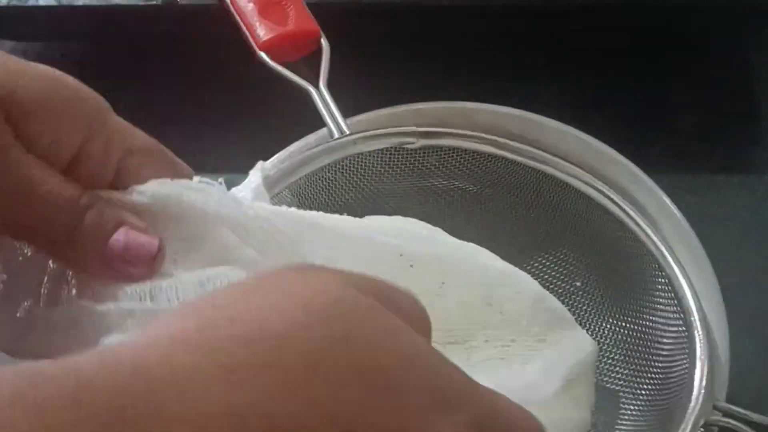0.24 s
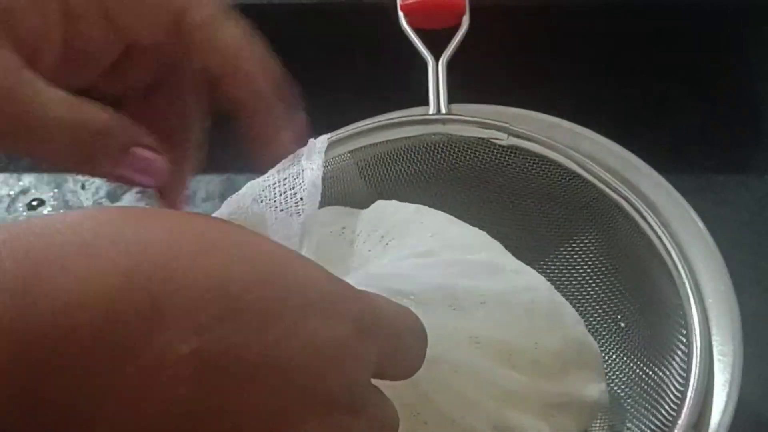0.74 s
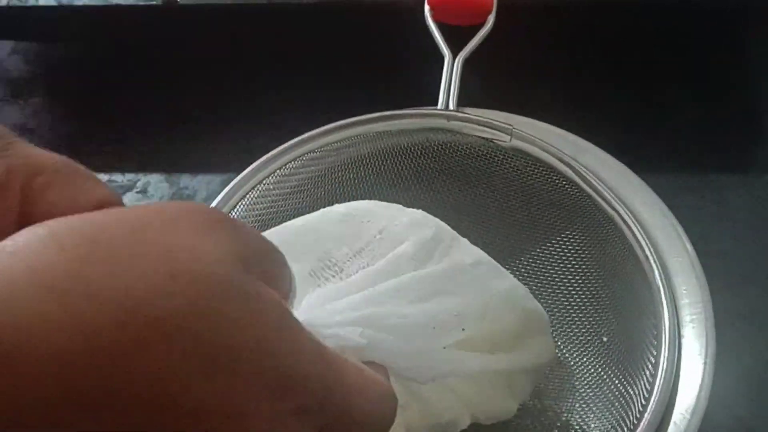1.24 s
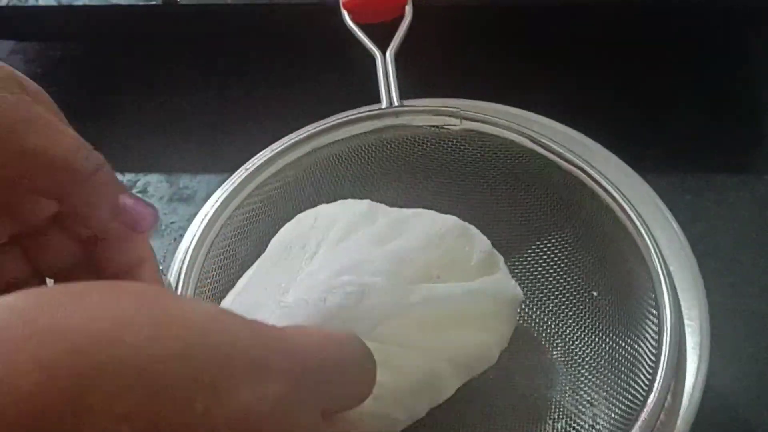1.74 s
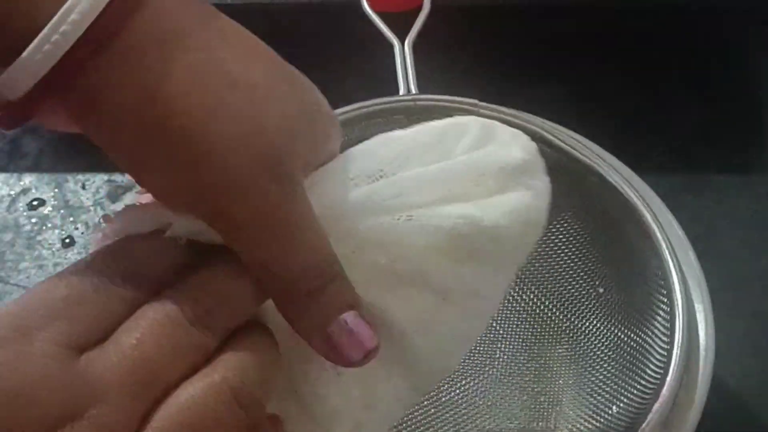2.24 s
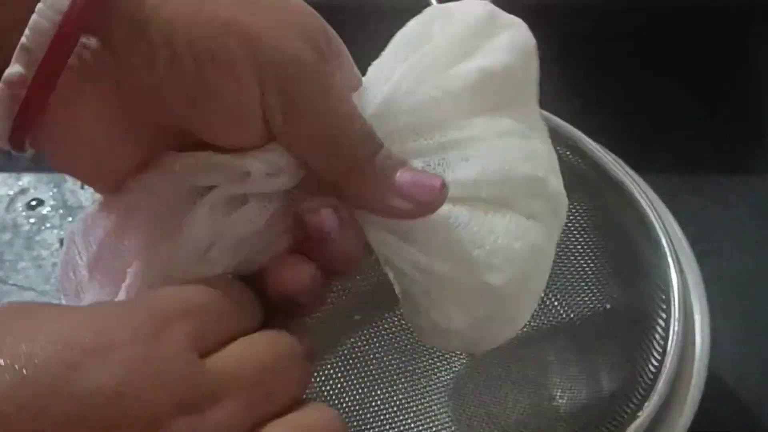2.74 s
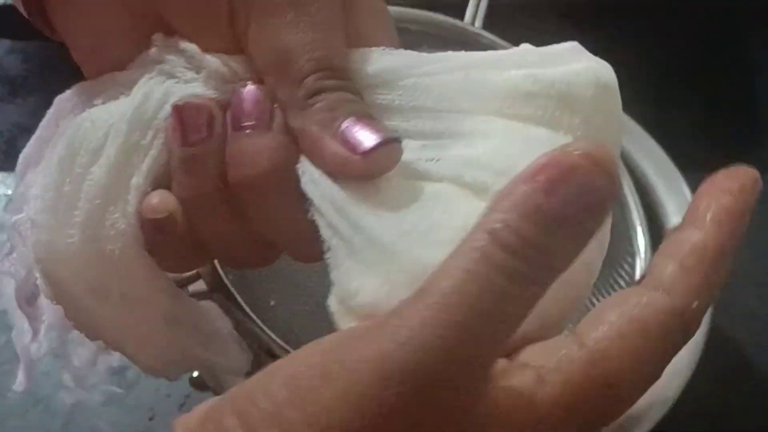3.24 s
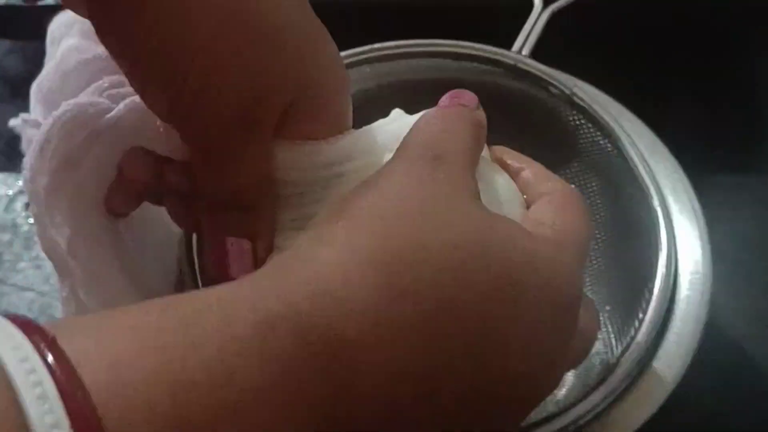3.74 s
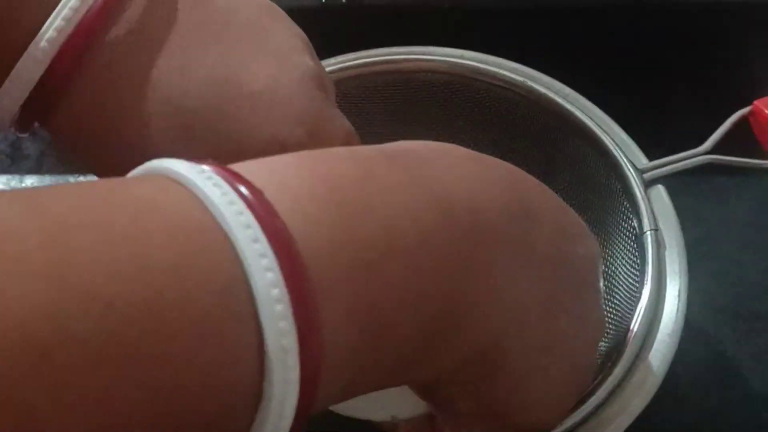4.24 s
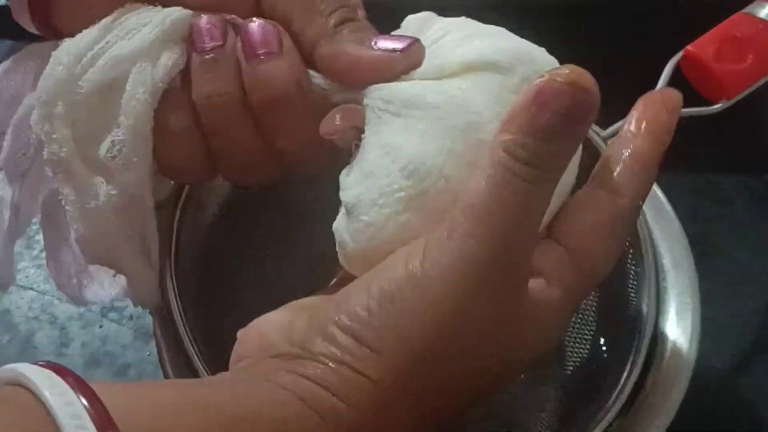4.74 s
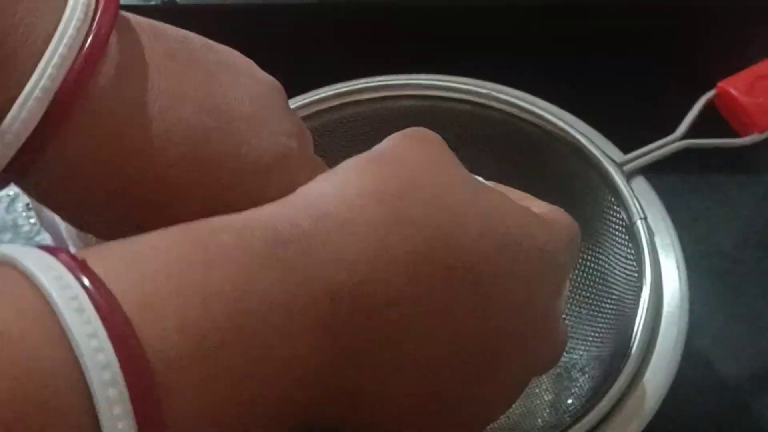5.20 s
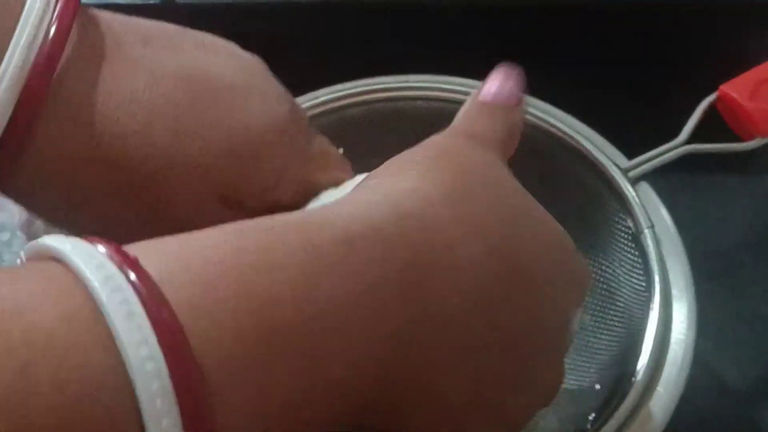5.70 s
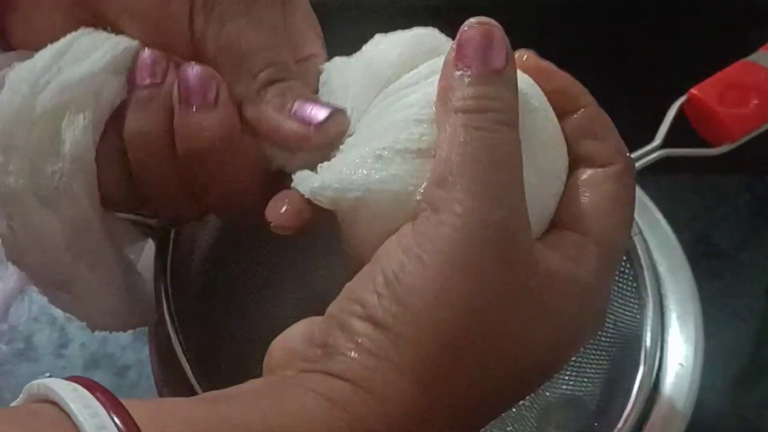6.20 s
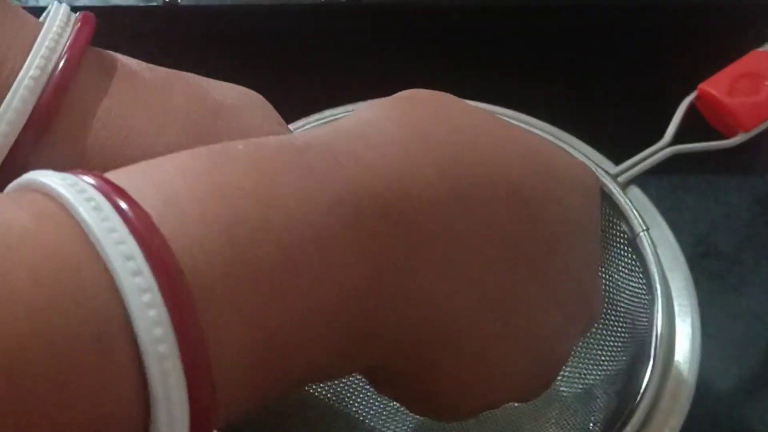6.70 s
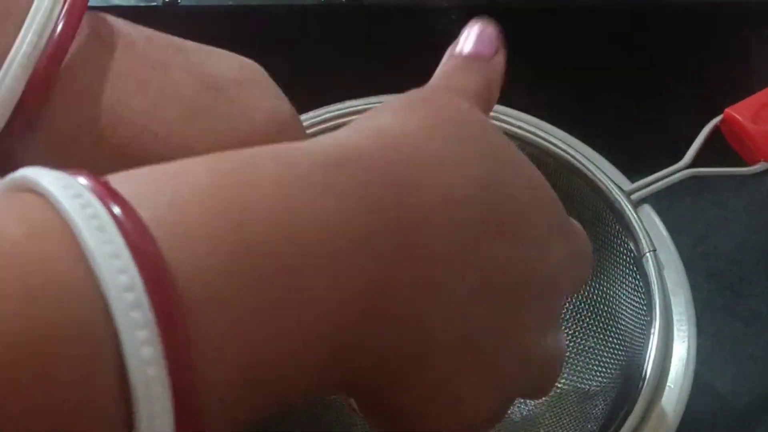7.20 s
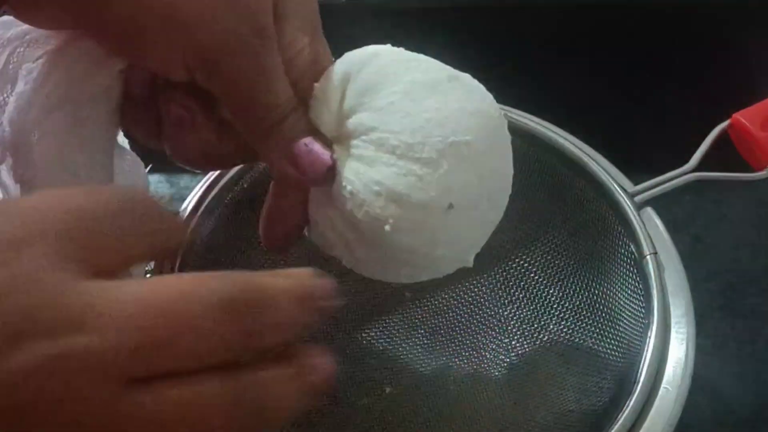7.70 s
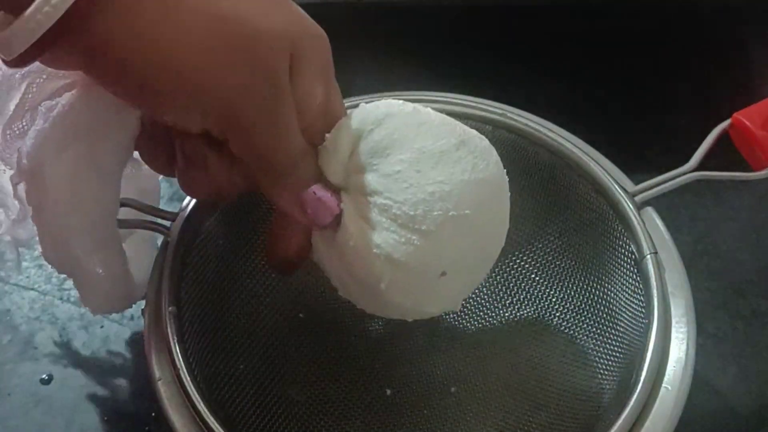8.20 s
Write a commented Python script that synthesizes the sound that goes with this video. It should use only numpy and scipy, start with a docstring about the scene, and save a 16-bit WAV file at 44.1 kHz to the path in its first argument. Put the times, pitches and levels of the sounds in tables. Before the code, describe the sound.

In a quiet kitchen, close in stereo, a wire strainer knocks on a steel bowl resting on a stone counter. From 0 to 0.8 s there are scattered clanks, strongest near 0.4 s; after a short lull, a brisk rattling run fills 1.25 to 1.75 s, with firm hits near 1.25 and 1.6 s. It dies away by 2.1 s, leaving faint, crisp wet ticks from cloth and whey. A small group of knocks comes at 2.8 to 3 s, then soft thuds and rubs until 4.3 s. Denser clatter runs from 4.4 to 6.5 s, with brief gaps, low thuds and bright clinks. Only wet ticks remain around 6.7 to 6.9 s. A last cluster rattles from 7.2 to 7.8 s, then tiny fizzing ticks to 8.4 s. A faint low hum throbs throughout under soft airy rustle; the room tail is short and dull.

```python
"""In a quiet kitchen, wet cheese in a cloth is squeezed over a steel strainer resting on a steel bowl.
The strainer knocks on the bowl on a stone counter: noise bursts excite resonant modes of steel and wire.
Whey and cloth tick faintly: grains of noise ring around one pitch. A dull diffuse tail follows both.
Underneath lie flickering bands of noise, wavering narrow tones and two steady tones that beat.
Two microphone ports a hand apart hear it in stereo."""
import sys
import numpy as np
from scipy import signal
from scipy.fft import rfft, irfft
from scipy.io import wavfile

SR = 44100
rng = np.random.default_rng(int(sys.argv[2]) if len(sys.argv) > 2 else 0)


def master(y):
    """Save y as 16-bit WAV."""
    cut = np.clip(np.atleast_2d(y).T, -1, 1)
    pcm = np.round(cut * 32767)  # scale
    wavfile.write(sys.argv[1], SR, pcm.astype(np.int16))


N = 372733

# Strainer knocking on the bowl; levels precede the part gains, lengths the part factors:
# (time [s], strength [dB], weight [dB], hardness [dB], mesh sizzle [dB], rattle length [s],
#  centre pitch of a boost to nearby modes [Hz]); around 3250 Hz little is boosted
KNOCKS = [(0.003, -37.0, -6.5, -18.0, -20.0, 0.046, 3250), (0.061, -28.5, -1.5, -50.5, 3, 0.048, 3250),
          (0.157, -21.5, -5, -51.5, -2, 0.03, 3300), (0.315, -62.5, -5, 4.5, -9, 0.14, 3560),
          (0.39, -10.5, -8.5, -12.5, -13.0, 0.04, 5840), (0.466, -39.5, -11, -16, -29, 0.11, 3250),
          (0.555, -19.5, -7, -8.5, -13.5, 0.046, 3600), (0.768, -15.5, -14, -9.5, -13.5, 0.048, 3730),
          (1.023, -53.5, 7, -8.5, -15, 0.045, 2990), (1.062, -47.5, -4, -7, -5, 0.023, 7100),
          (1.152, -64, -8, 5, -5.0, 0.085, 4390), (1.19, -54.5, -9.5, 6, -10.0, 0.22, 5900),
          (1.246, -5.5, -14.5, -23, -19, 0.043, 2660), (1.288, -19, -8.5, -5.5, -18.5, 0.048, 4300),
          (1.32, -16, -17.5, -16.5, -11, 0.11, 2400), (1.39, -10, -14.5, -12, -5, 0.043, 2720),
          (1.427, -18, -10.5, -15, -20.0, 0.048, 2720), (1.483, -23.5, -7.5, 2, -12.5, 0.039, 6460),
          (1.577, -5.5, -16, -18.5, -20, 0.031, 3200), (1.603, -18, -4, -6.5, -14, 0.04, 4500),
          (1.671, -26, -13, -16, -16, 0.046, 4570), (1.709, -24.5, -1, -35, -15.0, 0.034, 4400),
          (1.723, -21, -6.5, -63, -2, 0.039, 3270), (1.853, -36, -9, -49, 1.0, 0.066, 2410),
          (1.916, -62.5, 17, 3, -3.5, 0.08, 3150), (1.993, -41.5, 4, -49, -6.0, 0.032, 3250),
          (2.062, -48.0, -25.0, -36, -1.0, 0.028, 3300), (2.403, -45.5, -27, -9, -2, 0.097, 6800),
          (2.789, -33.5, -6.5, 1.5, -15, 0.037, 3300), (2.848, -14.5, -15, -17, -16, 0.034, 3300),
          (2.908, -15.0, -8.0, -21, -19, 0.028, 3250), (2.977, -46, -2, -3, -23, 0.035, 4440),
          (3.507, -54.5, 0.5, -15, -10.0, 0.071, 3610), (3.571, -39.0, 8, -17, -11.0, 0.075, 5960),
          (3.639, -59, 20, 9, -13.0, 0.055, 3250), (4.016, -48, 3, -40, 13.0, 0.081, 3250),
          (4.06, -41.5, 3, -14.5, -19, 0.11, 3250), (4.1, -39.5, 12, -22, 1, 0.059, 3250),
          (4.286, -61, 10.5, 3, -26.0, 0.096, 4480), (4.413, -25.5, -5.5, 6.0, -6, 0.067, 4400),
          (4.477, -25.5, -4, -2.5, -11, 0.033, 4300), (4.527, -41, -6, -7, 4, 0.076, 3250),
          (4.58, -54.5, -8, 5.5, 1, 0.12, 5850), (4.651, -38.5, -7.5, -2, -10, 0.17, 5660),
          (4.685, -16, -15, 0, -12, 0.046, 3200), (4.764, -10, -14, -21.5, -18, 0.031, 2720),
          (4.88, -41, -10, -11.5, -29.0, 0.094, 2750), (4.912, -42, -7, -5.5, -11, 0.026, 2720),
          (5.056, -11.5, -12.5, -19.5, -17.5, 0.069, 3250), (5.107, -22.5, -17.0, -3.5, -10, 0.037, 5700),
          (5.151, -30, 1, -19, -9, 0.073, 4500), (5.198, -13.5, -13.5, -15, -9, 0.077, 2330),
          (5.231, -21.5, -9, -8.5, -12, 0.041, 4240), (5.272, -21.5, -4.5, -9, -13, 0.045, 3230),
          (5.302, -22.5, 1.5, -25, -17.0, 0.053, 2730), (5.335, -46, 5.5, -0.5, -8.0, 0.11, 3250),
          (5.41, -12.5, -31, -14.0, -10.0, 0.068, 4000), (5.447, -23.5, -29, -10.5, -9.5, 0.049, 2730),
          (5.489, -18, -39, -14, -4.5, 0.04, 2820), (5.502, -30.0, 2, -2, -14, 0.047, 4280),
          (5.638, -38, -16, -13.5, -10, 0.017, 2780), (5.845, -17, 5.5, -16.5, -11, 0.085, 3250),
          (5.893, -25.5, -17.5, -9.5, -8, 0.045, 2720), (5.936, -20.0, -4.5, -11.0, -13, 0.03, 2780),
          (5.976, -14.5, 3, -26, -26.0, 0.016, 2450), (5.988, -19.5, -5, -11.5, -15.5, 0.033, 2700),
          (6.01, -29.5, -1.5, -8.0, -15, 0.057, 4430), (6.117, -38.0, -1, -14.5, -5, 0.14, 7730),
          (6.164, -24.5, -14, -3.5, -8, 0.037, 4020), (6.353, -40.5, 3.5, -6.5, -9, 0.13, 2750),
          (6.403, -9.5, -28, -8.5, -3, 0.058, 2840), (6.444, -26.5, -1.5, 0, -14, 0.022, 7400),
          (6.489, -27.5, -29, -13, -6, 0.062, 3250), (6.523, -26, -16, -6, -7.5, 0.035, 2950),
          (7.219, -45, 8.5, -4.5, -8, 0.065, 2730), (7.241, -29.0, -13.5, -5, -19, 0.084, 2700),
          (7.262, -24.5, -3.5, -6.0, -18, 0.039, 5870), (7.356, -14.5, -4, -12.5, -21.0, 0.041, 2500),
          (7.402, -27.5, -7, -13.5, -37, 0.067, 2740), (7.472, -29.5, 6.5, -9.5, -23, 0.093, 4470),
          (7.509, -20.5, -4, -16.0, -14.0, 0.04, 3250), (7.565, -28, 3.5, -26, -11, 0.056, 2720),
          (7.601, -44, 4, -7, -4, 0.082, 3250), (7.635, -12, -19, -5.5, -18, 0.065, 4840),
          (7.674, -33, -9.5, 0.5, -5, 0.078, 3200), (7.723, -29, -31, -6, -2.0, 0.06, 3250),
          (7.74, -18.5, -44, -15.5, -3.5, 0.03, 4240), (7.786, -48, -16, -3, -7.0, 0.035, 3760)]
# Modes of bowl and strainer ringing together: (frequency [Hz], level [dB], decay time T60 [s])
STEEL_MODES = [(115, -6.5, 1), (157.3, 5.5, 0.62), (243.3, -3.5, .12), (293.7, 6, .12), (341.2, 4.5, 0.15),
               (404.4, 5.5, 0.14), (585, -1, 0.078), (689.3, 0, 0.036), (782, 4.5, 0.061), (838, 2, 0.044),
               (1033, -0.5, 0.03), (1134, -7.5, 0.097), (1420, -11.5, 0.15), (1555, -6, 0.044),
               (1922, -6, 0.059), (2177, -12.5, 0.012), (2722, -3, 0.075), (4075, -15, 0.019),
               (4386, -6, 0.026), (4445, -2, 0.1), (4560, -13.5, 0.34), (5930, -14, 0.15),
               (5900, -7.5, 0.056), (6640, -7.5, 0.054), (6790, -8, 0.027), (7410, -3.5, 0.076)]
# What a knock shakes, as clank, counter boom, thud, rim clink, mesh hiss:
# (low edge [Hz], high edge [Hz], dense unresolved modes [dB], rattle length factor [1],
#  rise of a short contact [s], gain [dB], lumpiness [dB per unit lump])
PARTS = [(610, 2030, -7.5, 1.66, 0.0038, -9, 3), (113.8, 208.3, -22, 1.9, 0.0048, -7, 3.5),
         (208, 489, -20, 1.46, 0.002, -3, 5), (2650, 6870, -14.5, 1.53, 0.00031, -3.5, 0),
         (7860, 17500, -8, 1.3, 0.00061, -3.5, -1.5)]
STRIKE_SPREAD_DB = 4  # how unevenly one knock reaches the modes
BOOST_DB, BOOST_WIDTH = 11.5, 0.12  # boost at its centre pitch; width as a natural-log pitch ratio
FIRST_LUMP, CHATTER_HZ = 0.43, 114.7  # the rattle comes in lumps, the first at a set height
RUB_S = 0.098  # contacts longer than this are rubs and swell in slowly
EARLY_FADE = 0.94  # the ringing fades early: fall time of a second envelope, in scaled rattle lengths


def knocks(size=2 ** 14):
    """Modal excitation: each knock is a lumpy rattle driving the steel modes with its own strengths."""
    out, hz = np.zeros((2, N)), np.fft.rfftfreq(size, 1 / SR)
    mode_hz, mode_db, t60s = np.transpose(STEEL_MODES)[:, :, None]
    modes, strike_wires = amp(mode_db) * resonators(hz, mode_hz, t60s), wire_mesh(hz)
    filters = [signal.butter(3, part[:2], "band", fs=SR, output="sos") for part in PARTS]
    bands = [signal.sosfreqz(sos, hz, fs=SR)[1] for sos in filters]
    for s, *blow_db, length, boost_hz in KNOCKS:
        boost_db = BOOST_DB * np.exp(-(np.log(mode_hz[:, 0] / boost_hz) / BOOST_WIDTH) ** 2)
        uneven_db = STRIKE_SPREAD_DB * rng.standard_normal(len(STEEL_MODES))
        strengths = amp(boost_db + uneven_db) * rng.choice([-1, 1], len(STEEL_MODES))
        lumps = np.r_[FIRST_LUMP, FIRST_LUMP, rng.standard_normal(size=198)]
        lumps = np.interp(np.arange(size) * CHATTER_HZ / SR, np.arange(len(lumps)), lumps)
        ringing, dense = strengths @ modes, strike_wires()
        noise, total = rng.standard_normal((3, size)), 0
        for level_db, band, part in zip(part_levels(*blow_db), bands, PARTS):
            dense_db, longer, rise, gain_db, lumpy_db = part[2:]
            rise *= 1 + (length / RUB_S) ** 4
            rattle = noise * amp(lumpy_db * lumps) * burst(size, .5 * length * longer, rise)
            response = band * (ringing + amp(dense_db) * dense)
            sound = irfft(two_ports(rfft(rattle), hz) * response, size)
            sound = sound * burst(size, EARLY_FADE * length * longer, 0)
            early_rms = np.sqrt(np.mean(sound[:, :1300] ** 2))
            total = total + amp(level_db + gain_db) * sound / early_rms
        add(out, total, s - .002)
    return out


# Counter boom as a linear rule in the blow:
# (offset [dB], per strength [dB/dB], per weight [dB/dB], per hardness [dB/dB])
BOOM_RULE = (-14.5, 0.7751, 0.24, 0.23)


def part_levels(strength_db, weight_db, hardness_db, sizzle_db):
    """Contact spectrum: weight and hardness of a blow share it among clank, boom, thud, clink and hiss."""
    boom_db = np.dot(BOOM_RULE, [1, strength_db, weight_db, hardness_db])
    clink_db = strength_db + hardness_db
    return strength_db, boom_db, strength_db + weight_db, clink_db, clink_db + sizzle_db


# Whey and wet cloth ticking: (time [s], nominal peak, 12 dB above the early rms [dB], pitch [Hz])
TICKS = [(2.156, -48, 12130), (2.2, -44, 12240), (2.2498, -44.5, 4360), (2.3845, -48, 6240),
         (2.4394, -46, 7100), (2.69, -43, 9400), (3.1116, -41.5, 2690), (3.246, -45.5, 6500),
         (3.654, -43, 6600), (6.705, -44, 6930), (6.752, -38.5, 4080), (6.784, -48, 6760),
         (6.8855, -40.5, 3270), (6.922, -46.5, 10500), (6.939, -47.5, 5500), (7.835, -39.5, 11700),
         (7.877, -34.5, 11750), (7.964, -45, 9240), (8.083, -46, 6440), (8.127, -36.5, 2840),
         (8.161, -43.5, 11000), (8.243, -40, 12260), (8.2897, -48, 2240), (8.374, -43.5, 11900)]
TICK_S, TICK_S_PER_OCTAVE = 0.013, 0.002  # envelope length at 2 kHz; higher ones fizz longer


def ticks(size=2 ** 13, width=0.13):
    """Resonance of a wet pop: grains ring around one pitch over a fainter broad part; the mesh rings along."""
    out, hz = np.zeros((2, N)), np.fft.rfftfreq(size, 1 / SR)
    strike_wires = wire_mesh(hz)
    for s, peak_db, pitch_hz in TICKS:
        length = TICK_S + TICK_S_PER_OCTAVE * np.log2(pitch_hz / 2e3)
        resonance = 1 / (1 + 1j * (hz / pitch_hz - pitch_hz / (hz + 1)) / width)
        colour = resonance + amp(-36.0) * (hz > 1500)
        grains = rng.standard_normal((3, size)) * amp(4.6 * rng.exponential(1, size))
        drive = rfft(grains * burst(size, length, 0.0023))
        pop = irfft(two_ports(drive, hz) * colour * strike_wires(), size)
        early_rms = np.sqrt(np.mean(pop[:, :700] ** 2))
        add(out, amp(peak_db - 12.0) * pop / early_rms, s - .002)
    return out


WIRE_T60_S, WIRE_DB = 0.038, -1.5  # the many small modes of the wire mesh


def wire_mesh(hz, count=170):
    """High modal density: wire modes at chance pitches; each call of the result strikes them afresh."""
    wires = resonators(hz, rng.uniform(1198.6, 16500, (count, 1)), WIRE_T60_S)
    return lambda: 1 + amp(WIRE_DB) * rng.laplace(size=count) @ wires


def resonators(hz, mode_hz, t60s):
    """Damped oscillation: frequency response of each mode, one row a mode, height about 1 on top."""
    z, r, w = np.exp(-2j * np.pi * hz / SR), amp(-60 / (t60s * SR)), 2 * np.pi * mode_hz / SR
    return (1 - r) * 2 * np.sin(w) * z / (1 - 2 * r * np.cos(w) * z + (r * z) ** 2)


def burst(size, length, rise):
    """Transient envelope: an exponential approach times a fall slightly steeper than exponential."""
    t = np.arange(size) / SR
    fall = np.exp(-(t / np.clip(length, .004, .4)) ** 1.06)
    return (1 - np.exp(-t / max(rise, 1e-4))) * fall


# Power share of the sound that differs between the ports: (frequency [Hz], share [1])
OWN_SHARE = [(150, 0.0062), (350, .03), (700, 0.52), (3000, 0.69), (16000, 0.95)]
# The hands shade the ports unevenly: (frequency [Hz], left minus right [dB])
PORT_BALANCE = [(60, -3), (380, -0.5), (1500, -3), (2800, -1), (5500, -8), (9500, 1), (13500, -1.5)]
# the bass comes through the counter and reaches both ports together; the lag sets in around LAG_FROM_HZ
LEFT_LAG_S, LAG_FROM_HZ = .00032, 460


def two_ports(spectra, hz):
    """Partial coherence: shared sound reaches the left port later; a share differs from port to port."""
    own = np.clip(at_hz(OWN_SHARE, hz + 1), 0, 1)
    lag = LEFT_LAG_S / (1 + (LAG_FROM_HZ / (hz + 1)) ** 2)
    late = np.exp(-2j * np.pi * hz * lag)
    shared = np.sqrt(1 - own) * spectra[0] * np.array([late, np.ones_like(late)])
    both = shared + np.sqrt(own) * spectra[1:]
    return both * amp(at_hz(PORT_BALANCE, hz + 1) * [[.5], [-.5]])


ROOM_T60_S, ROOM_DB, WALL_CUT_HZ = 0.25, -22.5, 530


def kitchen(x):
    """Diffuse reverberation: a dull tail of exponentially decaying noise, alike at both ports in the bass."""
    t = np.arange(round(.5 * SR)) / SR
    mid, side = rng.standard_normal((2, len(t))) * amp(-60 * t / ROOM_T60_S) * (t > .008)
    side = signal.sosfilt(signal.butter(2, 450, "high", fs=SR, output="sos"), side)
    dull = signal.butter(1, WALL_CUT_HZ, fs=SR, output="sos")
    tail = signal.sosfilt(dull, [mid + side, mid - side])
    return signal.fftconvolve(x, tail / np.sqrt(np.sum(tail ** 2) / 2), axes=1)[:, :N]


# A tone that comes and goes in the hum: (frequency [Hz], width [Hz], middle level [dB])
WAVERING = [(182, 9.4, -65.5)]
# Swells of a thin tone: (time [s], level [dB])
FAINT_TONE = [(2.65, -64), (3.87, -63)]


def wavering_tones():
    """Narrow-band noise: one tone swells and fades within bounds, a thin one swells twice."""
    hum, swells = 0, 0
    for hz, width, level_db in WAVERING:
        hum = hum + amp(level_db + 6.2 * np.tanh(drift(2.1))) * narrow_noise(hz, width)
    for s, level_db in FAINT_TONE:
        swells = swells + amp(level_db) * np.exp(-((np.arange(N) / SR - s) / 0.15) ** 2)
    return hum + swells * narrow_noise(860, 4.2)


def narrow_noise(hz, width):
    """Resonant filtering: white noise through one two-pole resonance; rms 1."""
    r = np.exp(-np.pi * width / SR)
    poles = [1, -2 * r * np.cos(2 * np.pi * hz / SR), r * r]
    return rms_one(signal.lfilter([1, 0, -1], poles, rng.standard_normal(N)))


MAINS_HZ, BEAT_HZ, BEAT_PEAK_S = 100, 1.835, 2.6  # a motor runs slightly below the mains hum
MAINS_DB, MOTOR_DB = -61.5, -63.5  # amplitudes


def beating_hum():
    """Beats: two steady tones a hair apart throb at their difference frequency."""
    t = np.arange(N) / SR - BEAT_PEAK_S
    mains = amp(MAINS_DB) * np.sin(2 * np.pi * MAINS_HZ * t)
    motor = amp(MOTOR_DB) * np.sin(2 * np.pi * (MAINS_HZ - BEAT_HZ) * t)
    return mains + motor


# Kitchen background before the port balance: (low hum [dB], drone [dB], rustle [dB])
BACKGROUND = (-63, -61, -69.5)
# Low hum, shape of the spectrum: (frequency [Hz], relative density [dB per Hz])
HUM = [(12, -37), (20, -4), (54, 1.5), (108, 5.5), (182, -6), (231, -15), (300, -7.5), (390, -51),
       (660, -120)]
# Drone, shape of the spectrum: (frequency [Hz], relative density [dB per Hz])
DRONE = [(120, -30), (200, -7), (385, 4.5), (481, -17), (550, -0.5), (824, -5), (980, -3), (2000, -53),
         (2600, -48), (4400, -120)]
# Rustle, shape of the spectrum: (frequency [Hz], relative density [dB per Hz])
RUSTLE = [(760, -38.5), (1300, 0.5), (2510, -4), (6900, -5.5), (9390, -14), (15200, -10.5), (16000, -20),
          (16500, -38)]
BALANCE_DB = -2  # left minus right


def background():
    """Stationary noise: hum, drone and rustle, steady apart from a slight flicker."""
    hum_db, drone_db, rustle_db = BACKGROUND
    hum = amp(hum_db) * banded_noise(HUM, patchy_db=2.0, rate=4.6)
    drone = amp(drone_db) * banded_noise(DRONE, patchy_db=4.5, rate=7.2)
    rustle = amp(rustle_db) * banded_noise(RUSTLE, patchy_db=3.0, rate=8.0)
    return (hum + drone + rustle) * amp([[BALANCE_DB / 2], [-BALANCE_DB / 2]])


# Left-right likeness of the background: (frequency [Hz], correlation [1])
LIKENESS = [(60, 1), (240, -0.2), (950, 0.11), (3770, 0.11), (15000, -0.01)]


def banded_noise(spectrum, patchy_db, rate):
    """Third-octave synthesis: stereo noise bands flicker mostly on their own, slightly together; rms 1."""
    low_hz, high_hz = spectrum[0][0], min(spectrum[-1][0], 17000)
    edges = low_hz * 2 ** np.arange(0, np.log2(high_hz / low_hz) + .01, 1 / 3)
    out, together, white = 0, drift(9.0), rng.standard_normal((2, 2, N))
    for k, (low, high) in enumerate(zip(edges, edges[1:])):
        band = signal.butter(2, [low, high], "band", fs=SR, output="sos")
        mid, side = signal.sosfilt(band, white[k % 2])  # neighbouring bands use separate noise
        hz = np.sqrt(low * high)
        alike = np.clip(at_hz(LIKENESS, hz), -1, 1)
        gain = amp(at_hz(spectrum, hz) + patchy_db * (0.13 * together + drift(rate)))
        out = out + gain * (np.sqrt(1 + alike) * mid + np.sqrt(1 - alike) * side * [[1], [-1]])
    return rms_one(out)


def drift(rate):
    """Random modulation: noise through a two-pole low-pass on a coarse clock; rms 1."""
    r = np.exp(-80 * np.pi * rate / SR)  # one step is 40 samples
    slow = signal.lfilter([1], [1, -2 * r, r * r], rng.standard_normal(N // 40 + 2002))[2000:]
    return np.interp(np.arange(N) / 40, np.arange(len(slow)), rms_one(slow))


def amp(db):
    """Decibel law: level to amplitude ratio."""
    return 10 ** (np.asarray(db) / 20)


def rms_one(x):
    """Normalisation: scales to unit root mean square."""
    return x / np.sqrt(np.mean(x ** 2) + 1e-20)


def at_hz(points, hz):
    """Logarithmic pitch scale: reads a curve between its points."""
    return np.interp(np.log(hz), np.log(np.array(points)[:, 0] + 1), np.array(points)[:, 1])


def add(out, sound, s):
    """Superposition: mixes a stereo sound in at time s."""
    i = max(round(s * SR), 0)
    out[:, i:i + sound.shape[1]] += sound[:, :N - i]


def scene():
    """Superposition: near sounds, their reverberation and the background."""
    near = knocks() + ticks()
    room = amp(ROOM_DB) * kitchen(near)
    return near + room + wavering_tones() + beating_hum() + background()


CUTOFF_HZ = 16700


def record(dry):
    """Saturation and band limiting: peaks are rounded, the top is cut steeply."""
    return signal.sosfilt(signal.cheby2(14, 60, CUTOFF_HZ, fs=SR, output="sos"), np.tanh(dry))


dry = scene()
out = record(dry)
master(out)
```